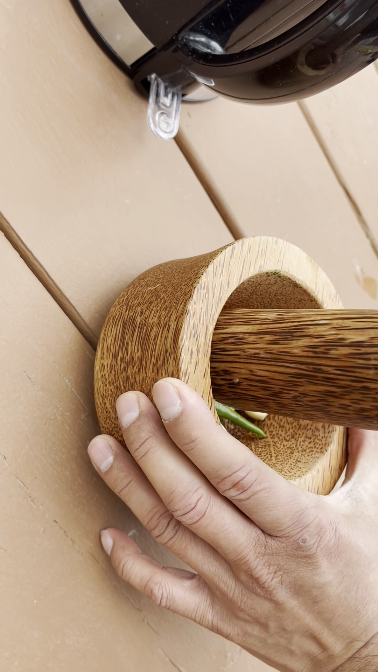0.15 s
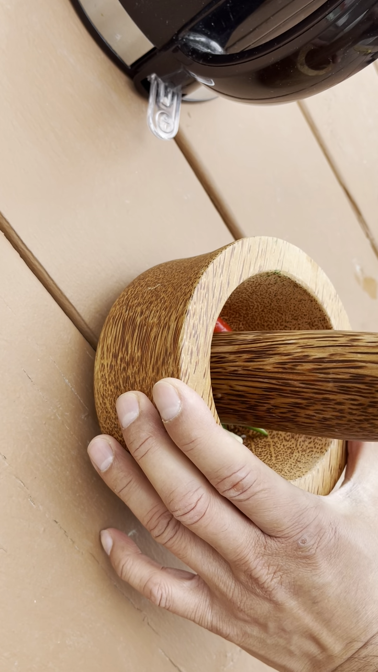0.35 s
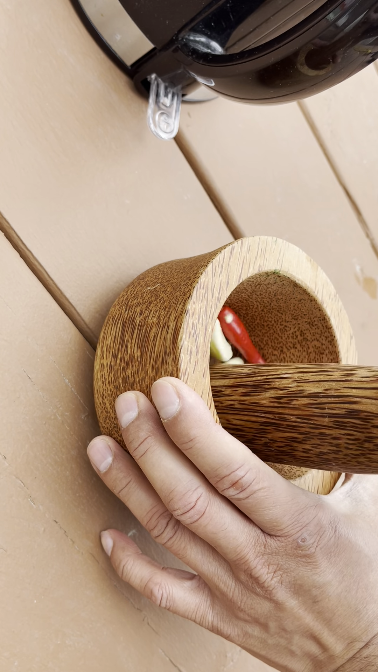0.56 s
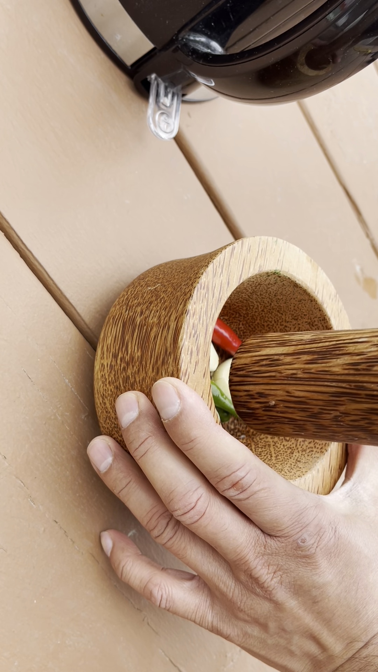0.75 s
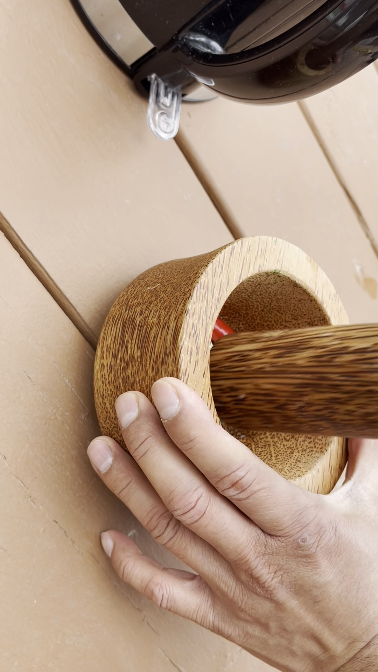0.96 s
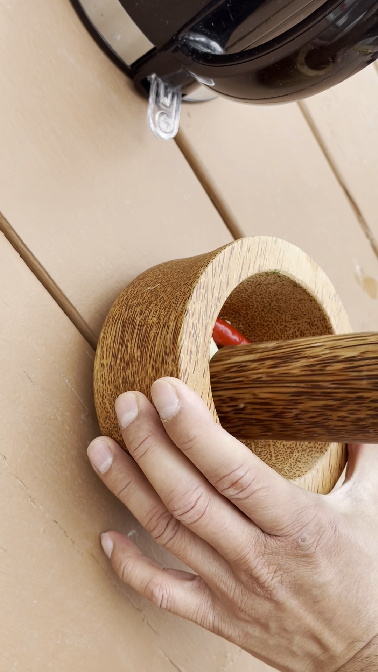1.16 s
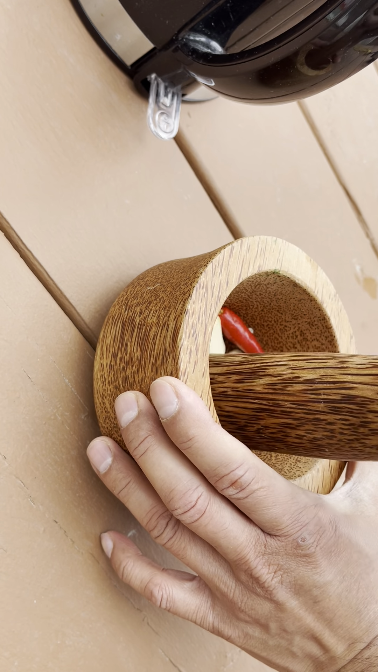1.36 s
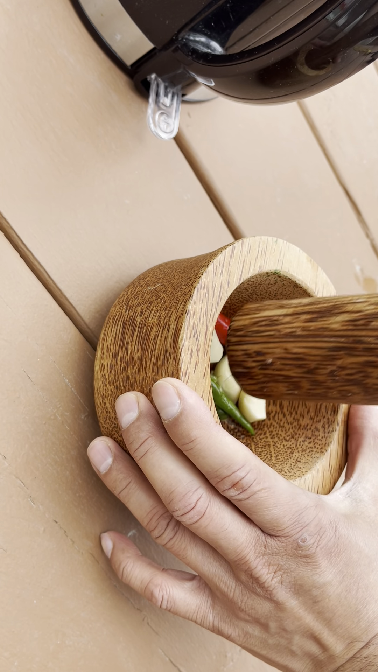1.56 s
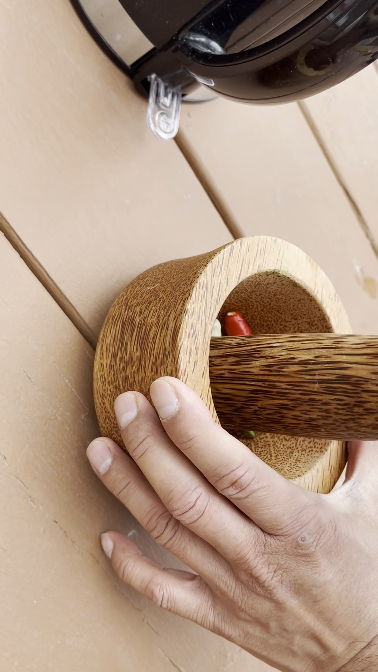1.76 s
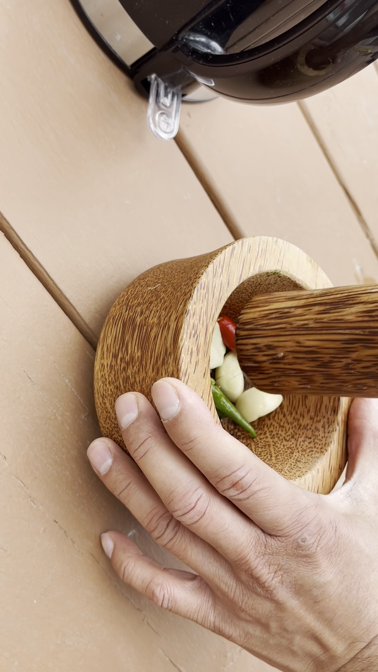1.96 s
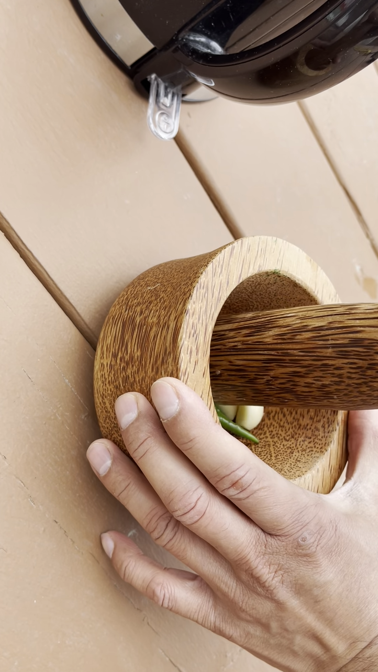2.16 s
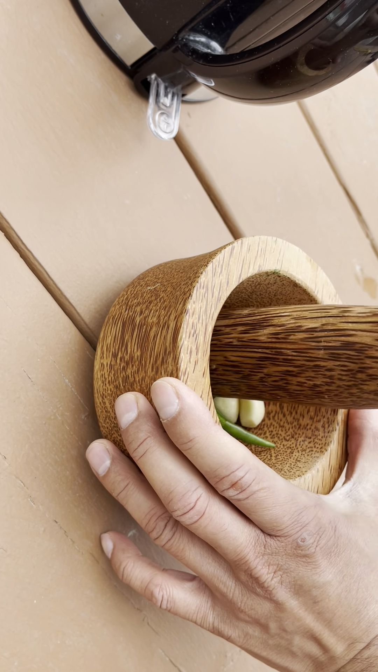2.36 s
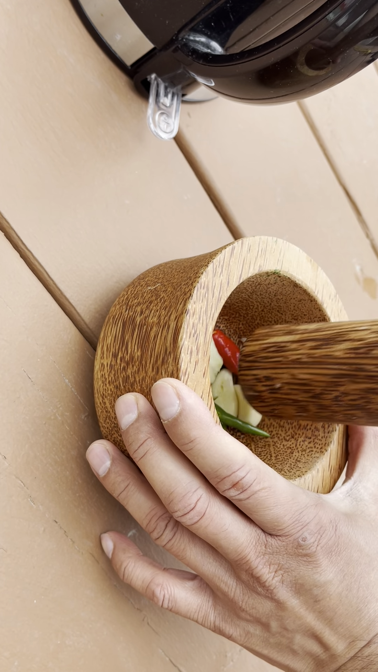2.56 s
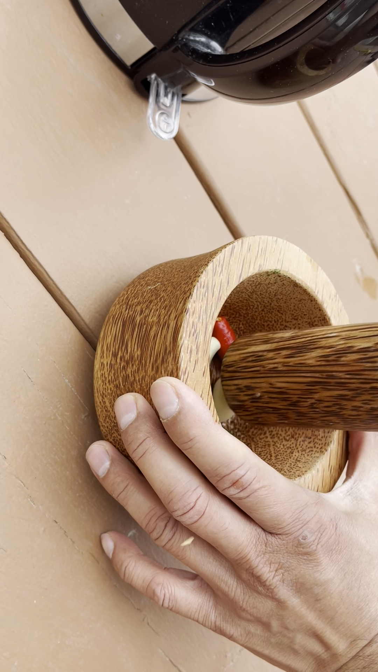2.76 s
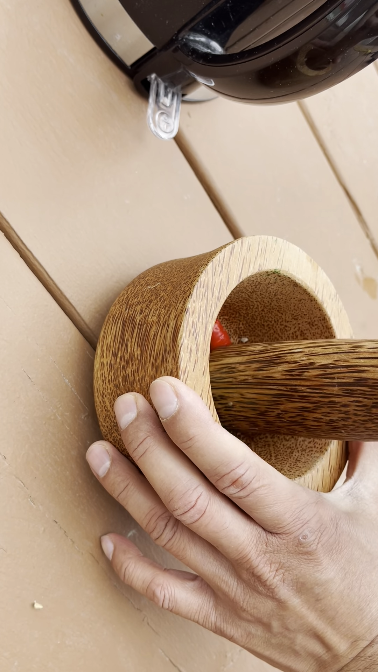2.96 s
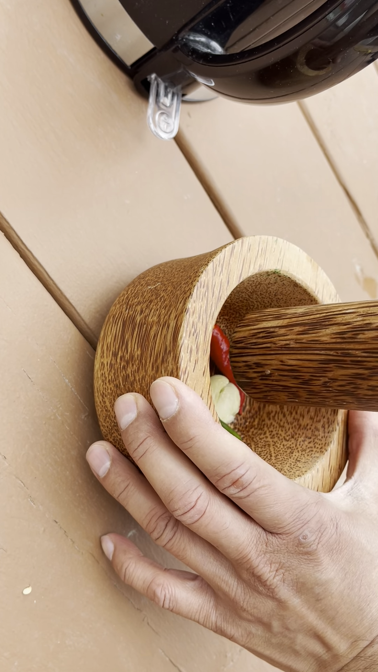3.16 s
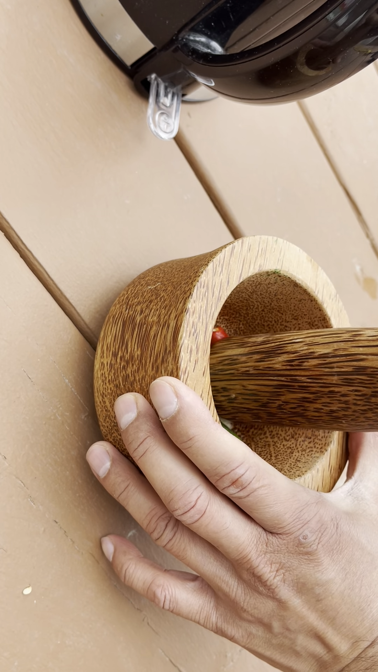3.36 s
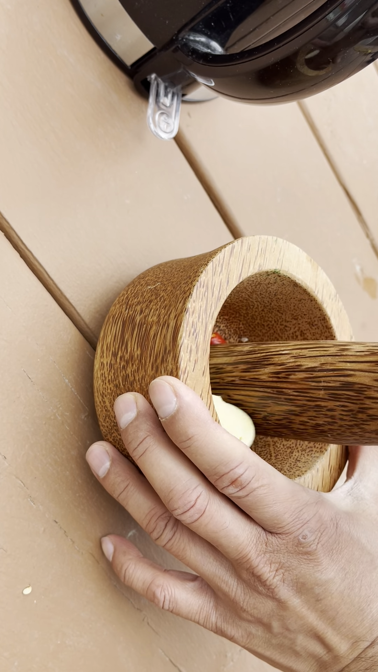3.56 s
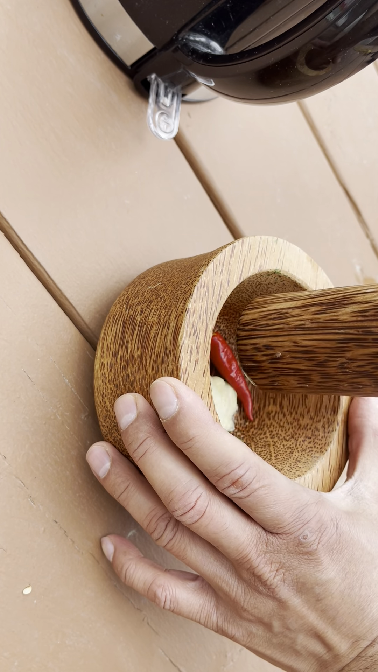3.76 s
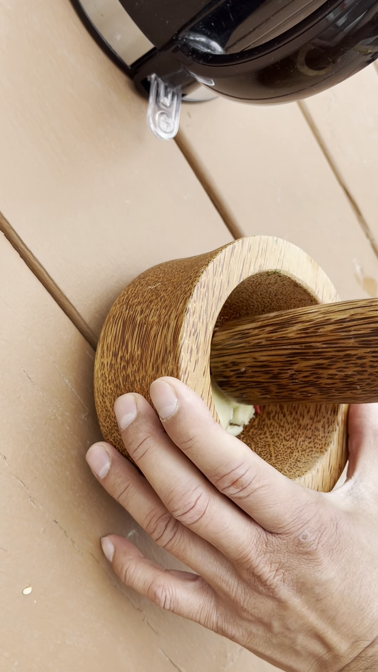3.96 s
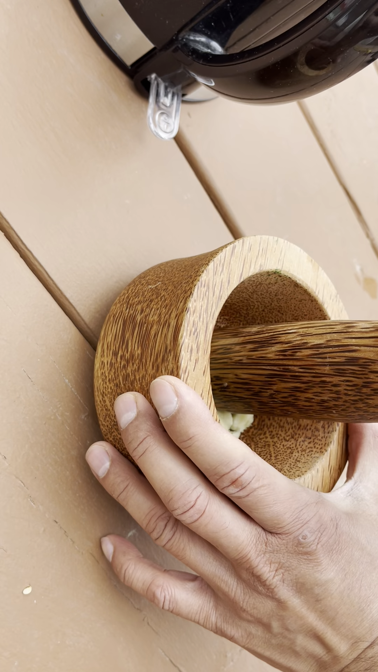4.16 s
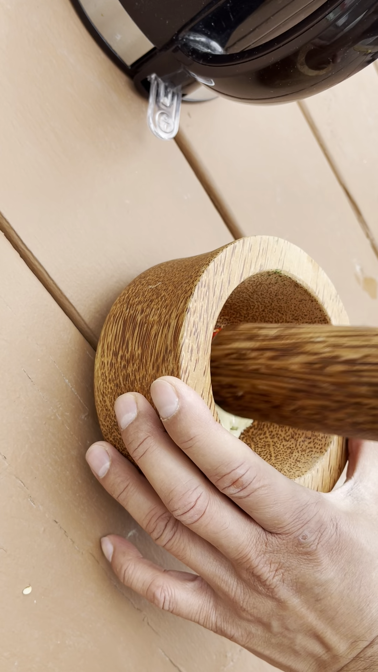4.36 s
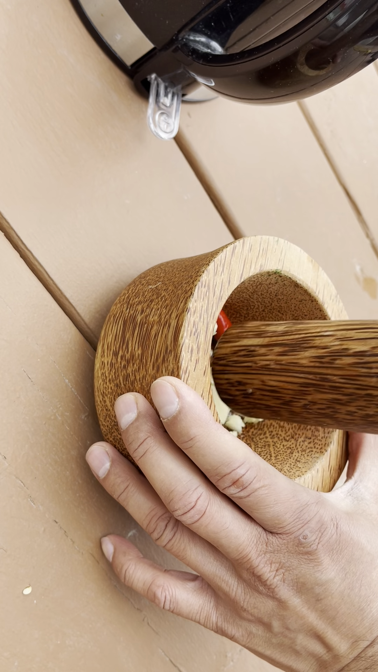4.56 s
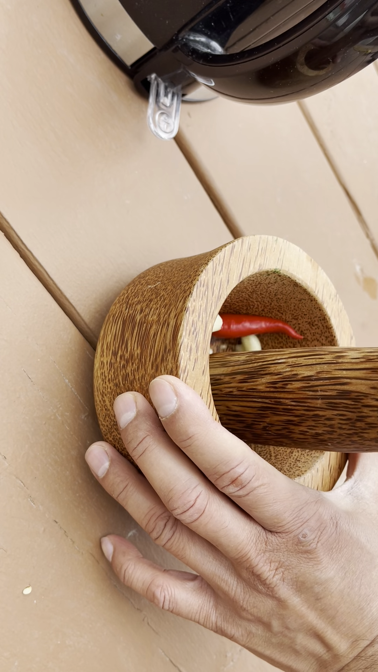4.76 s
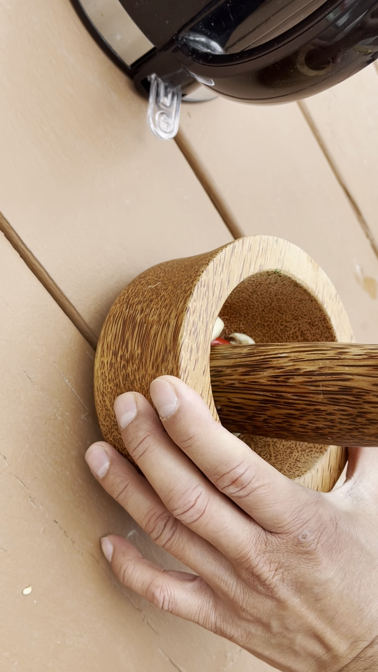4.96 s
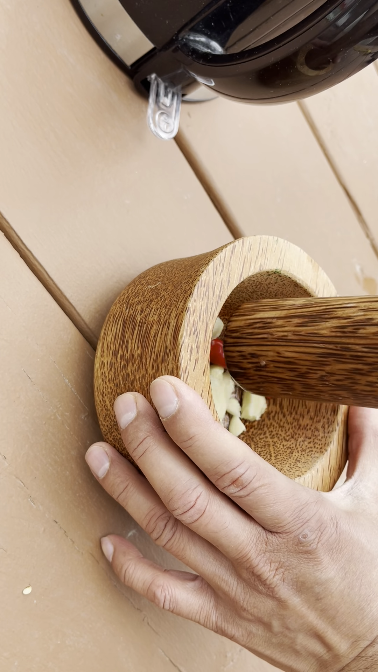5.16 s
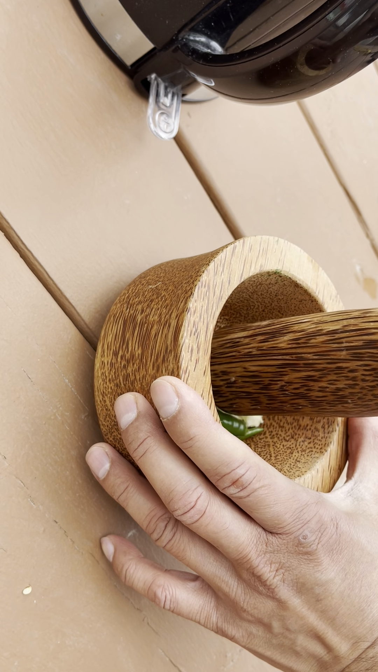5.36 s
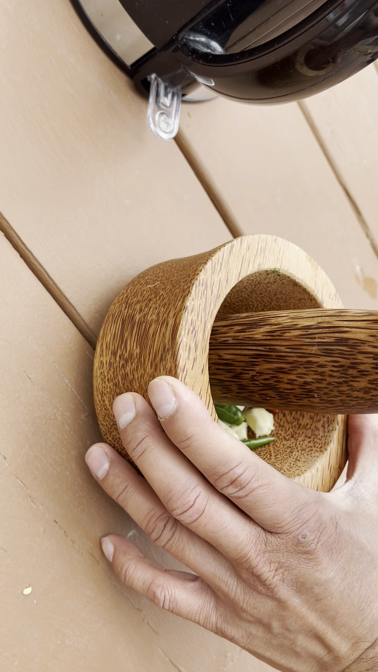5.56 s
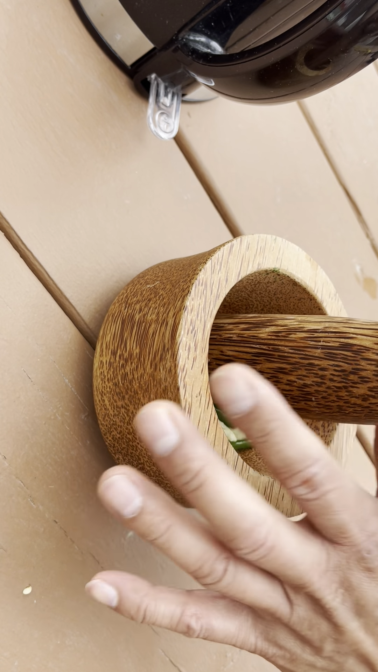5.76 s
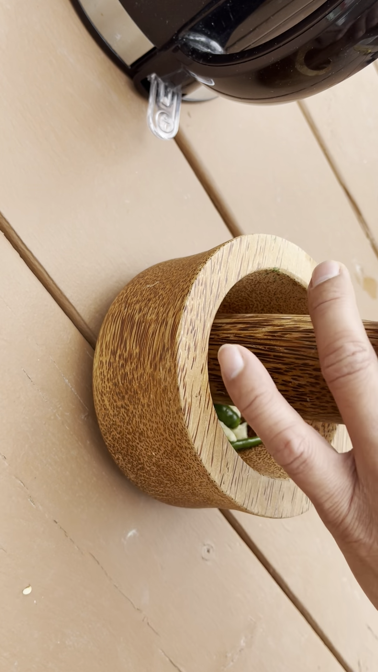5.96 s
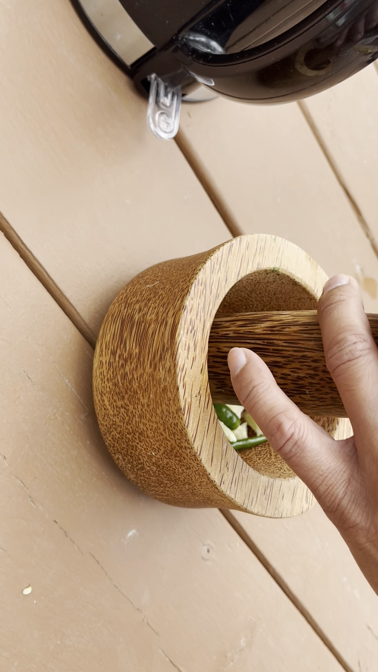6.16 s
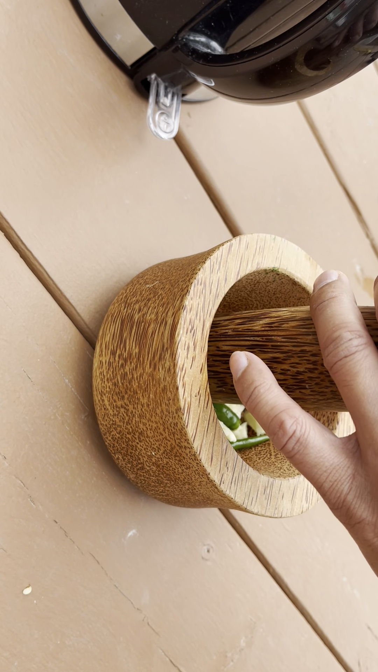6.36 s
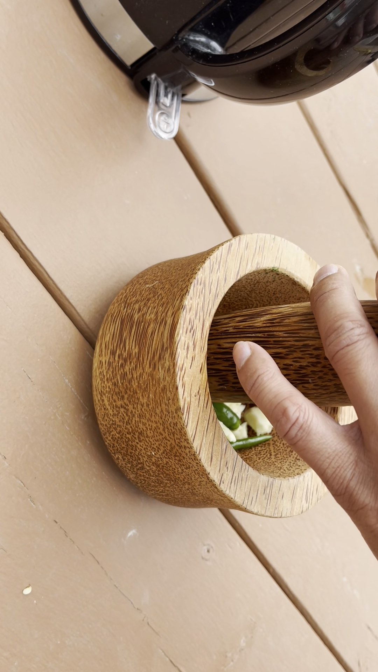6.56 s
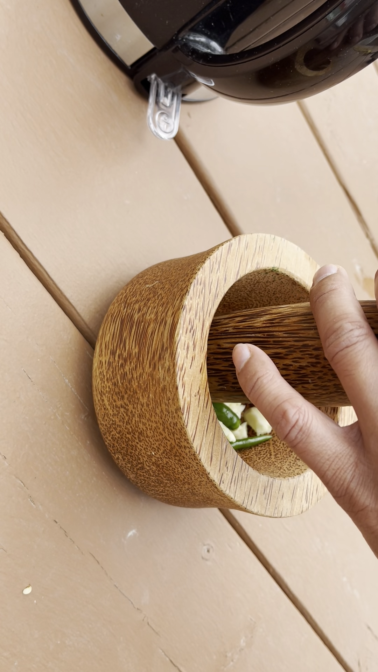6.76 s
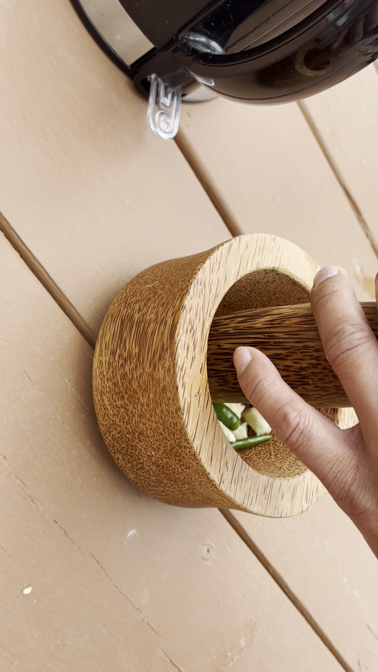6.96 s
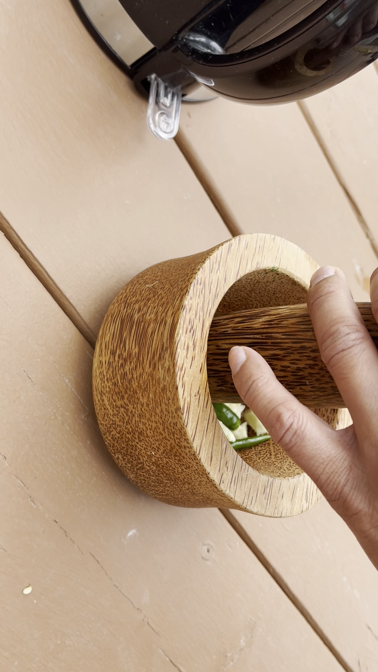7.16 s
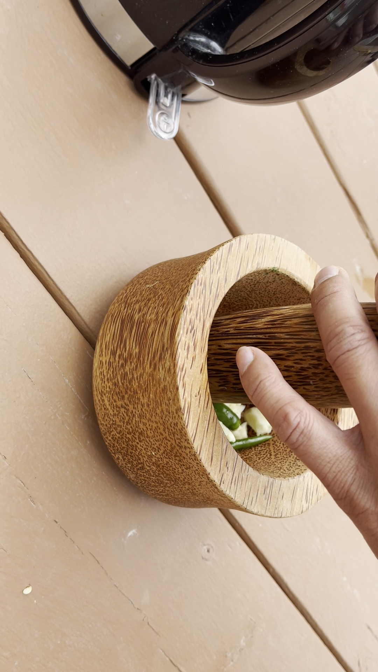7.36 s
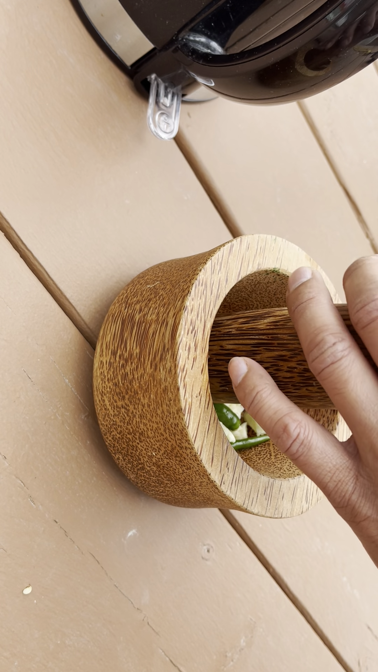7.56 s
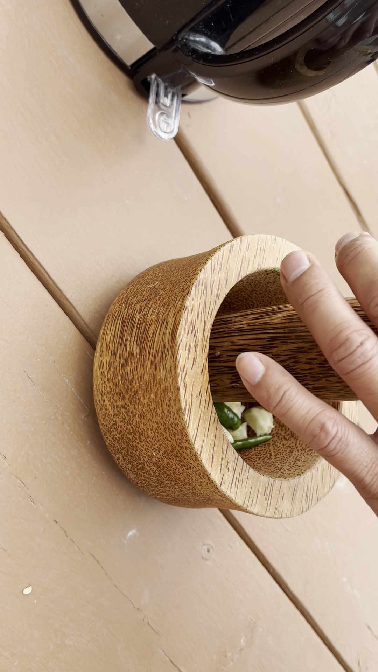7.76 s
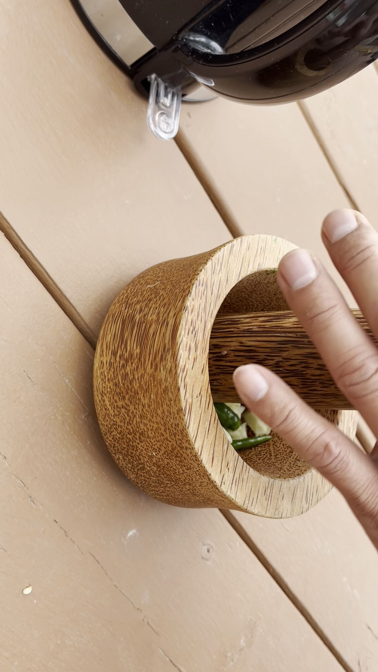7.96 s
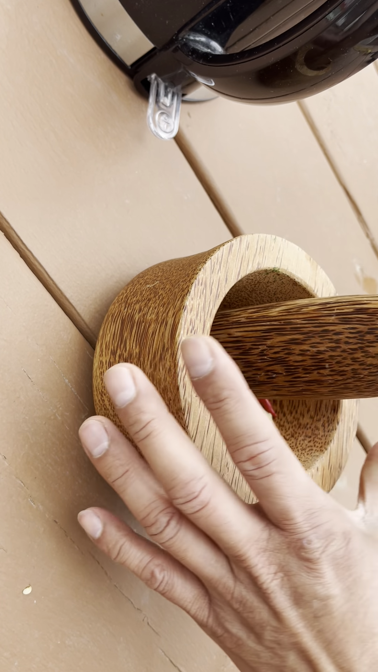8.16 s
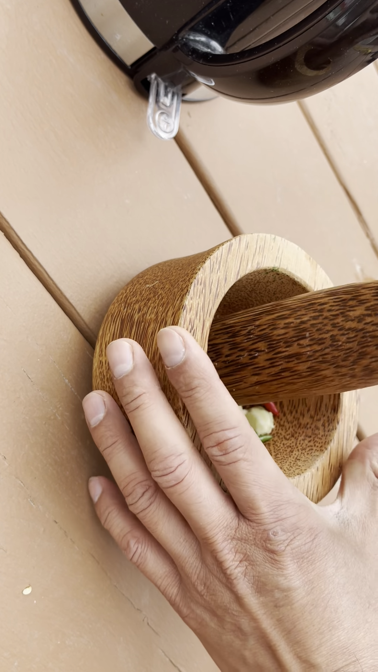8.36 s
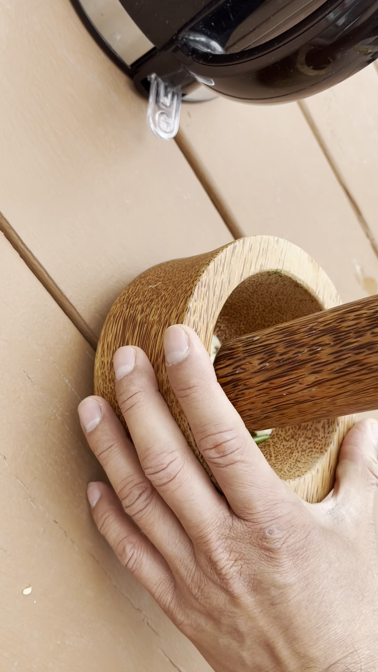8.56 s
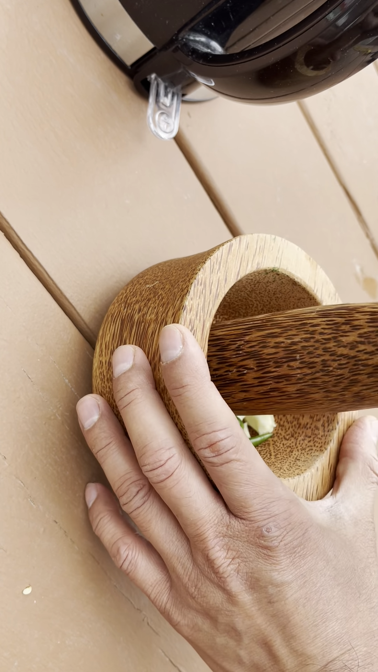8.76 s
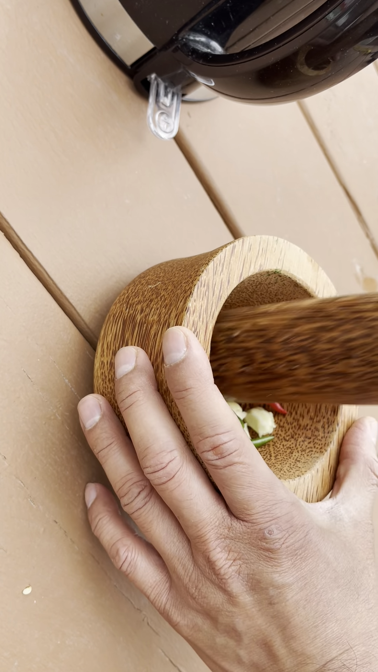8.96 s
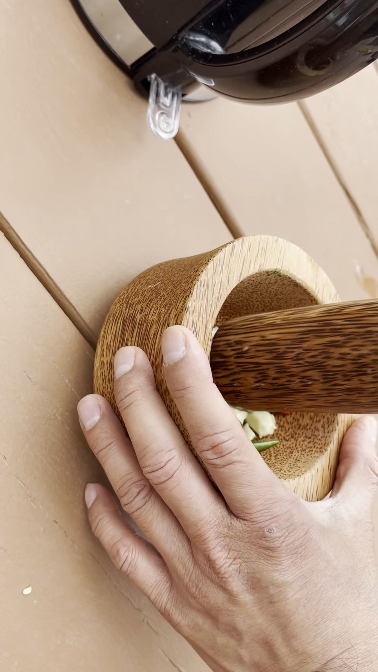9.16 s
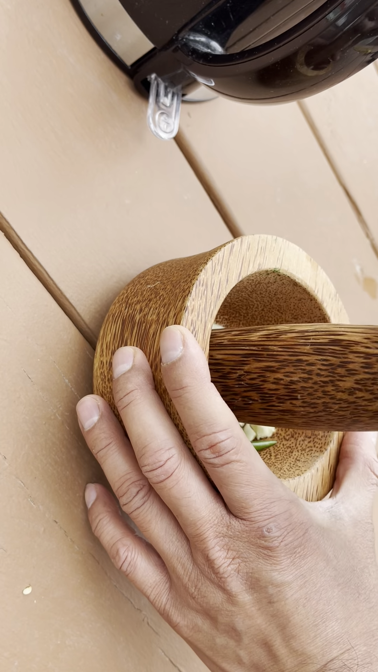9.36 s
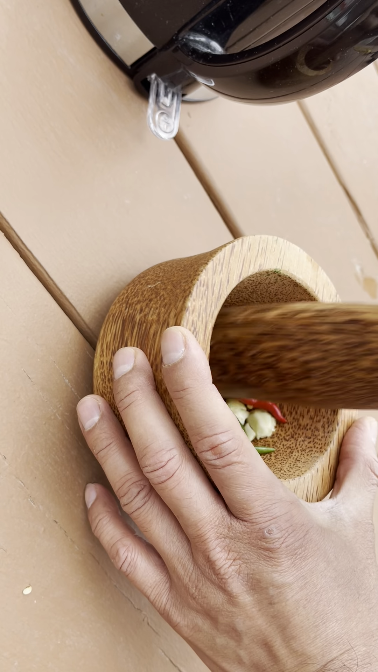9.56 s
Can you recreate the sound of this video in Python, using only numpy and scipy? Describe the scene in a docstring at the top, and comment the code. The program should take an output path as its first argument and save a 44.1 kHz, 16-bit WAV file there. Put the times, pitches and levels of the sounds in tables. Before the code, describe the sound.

Close, steady wooden knocks and deep board thuds with crisp crunching, over faint traffic; a faint machine starts up, wind rumbles, then pounding returns.

```python
"""Traffic rumbles far off throughout, as shaped noise, while a wooden pestle pounds garlic and chilies in a mortar.
Each blow crunches (noise grains), thuds and knocks (sums of decaying modes), then pulp grinds and squelches.
Near the middle a machine swishes up to speed, then hisses and whines (resonant noise, wandering sines).
Wind buffets the microphone (short distorted swings), mostly in the pause after the machine has started, among
touches, rubs and soft blips; pounding resumes near the end."""
import sys
import numpy as np
from scipy import signal
from scipy.fft import rfft, irfft, next_fast_len
from scipy.io import wavfile
from scipy.ndimage import uniform_filter1d, minimum_filter1d

SR = 44100
rng = np.random.default_rng(int(sys.argv[2]) if len(sys.argv) > 2 else 0)


def transcribe(u):
    """Save the signal u as a 16-bit wav file named by the first command-line argument.

    u: samples, shape (n,) or (channels, n), limited to [-1, 1]; the rate is SR.
    q: integer samples, one column per channel.
    """
    v = np.clip(np.atleast_2d(u).T, -1, 1)
    q = np.round(v * 32767).astype(np.int16)
    wavfile.write(sys.argv[1], SR, q)


N = 423801

# Spectrum of the far rumble: (frequency [Hz], density [dB per Hz])
FAR_SPECTRUM = [(12, -28), (20, -7), (43, 5), (100, -2), (217, -14.5), (254, -12), (351, -24), (483, -24),
                (1050, -30.5), (2900, -50.5), (12000, -56.5), (15600, -105), (22000, -120)]
# Phase by which the left port leads the right: (frequency [Hz], lead [rad])
LEFT_LEAD = [(0, 0), (950, .6), (1460, 0), (2930, .8), (4390, 1.5), (5340, 5.3), (5770, 6.1), (8440, 9.1),
             (9560, 9.7), (12000, 12.3), (15500, 15.6)]
# Level of the left port over the right: (frequency [Hz], level [dB])
LEFT_GAIN = [(60, -.5), (200, -2), (700, -4.5), (1290, -1), (2380, -1.5), (4400, -.3), (15000, 0)]
# Pestle blows: (time [s], thud level [dB], thud centre [Hz], knock level [dB], knock centre [Hz],
# crunch level [dB])
BLOWS = [(.006, -1.5, 223, -10, 637, -12.5), (.268, -10, 137.8, -24, 480, -23),
         (.547, -11, 165.5, 0.5, 1640, -17.5), (1.016, -4.5, 155.4, -12, 513, -16.5),
         (1.329, -2.5, 125, -1, 483, -10.5), (1.744, -5.5, 153, -16.5, 525, -15),
         (2.074, -9.5, 141, -4.5, 556, -20.5), (2.329, -5, 149, -15, 570, -21.5),
         (2.611, -15.5, 207.8, 2.5, 1775, -24), (2.918, -12.5, 258, -2, 1880, -14.5),
         (3.028, -32.5, 237.5, -28, 1240, -68.5), (3.248, -5.5, 157, -10.5, 529, -17),
         (3.546, -7, 225, -26.5, 680, -18.5), (3.854, -17, 133.5, -24.5, 660, -18.5),
         (4.123, -7, 133.2, 6.5, 1546, -11), (4.413, -14.5, 132.5, -20.5, 585, -19.5),
         (4.682, -9, 126, -20.5, 505, -17), (4.946, -10, 140, -26.5, 490, -17),
         (5.24, -13, 192.3, -32.5, 560, -26.5), (5.522, -14, 237, -27.5, 630, -18.5),
         (8.741, -15.5, 132, -25, 646, -29.5), (9.015, -2.5, 128.4, -15, 588, -17),
         (9.3, -4.5, 131.5, -9.5, 484, -13.5), (9.596, -13, 186, -15, 557, -17)]
# Modes of the boards under the mortar: (frequency [Hz], level [dB], T60 [s])
BOARD_MODES = [(72.3, -7.5, 0.92), (107.9, -11, 0.98), (137.7, 5.5, 0.28), (165.3, 4.5, 0.099),
               (207, -4.5, 0.018), (257.6, 0, 0.21), (296, -5, 0.22), (346.5, -8.5, 0.19),
               (388, -15, 0.072)]
# Modes of mortar and pestle: (frequency [Hz], level [dB], T60 [s])
WOOD_MODES = [(467.6, 6, 0.078), (529, 17, 0.035), (613.3, 12.5, 0.062), (683.6, 2.5, 0.084),
              (740.6, -5, 0.022), (849.5, 1.5, 0.039), (905, -9.5, 0.13), (1010, -6, 0.1), (1044, 0, 0.067),
              (1203, -6, 0.062), (1305, -6.5, 0.017), (1440, -14, 0.039), (1551, -5.5, 0.056),
              (1756, 2, 0.013), (1830, -11.5, 0.026), (2264, -2.5, 0.036), (2520, -15.5, 0.014),
              (3050, 1, 0.0076), (3390, -12, 0.019), (3980, -10.5, .01)]
# Spectrum of snapping fibres: (frequency [Hz], density [dB per Hz])
CRUNCH_SPECTRUM = [(300, -51.5), (900, -4), (2000, 1), (3500, 0.5), (5500, -2.5), (8000, 0.5), (10500, 3),
                   (13000, -14.5), (16000, -19.5)]
# Spectrum of the sticky crackle: (frequency [Hz], density [dB per Hz])
STICKY_SPECTRUM = [(300, -12.5), (1000, 1.5), (2000, -12), (4000, -7.5), (8000, -12), (11000, -5.5),
                   (13000, -31)]
# Spectrum of pressed or rubbed pulp: (frequency [Hz], density [dB per Hz])
SQUASH_SPECTRUM = [(300, -26), (780, -2), (950, 12), (1200, 0), (1750, 6), (2400, -5), (5000, -17),
                   (12000, -39)]
# Pulp squirting under a blow or squelching at the lift: (time [s], level [dB], length [s])
SQUELCHES = [(0.087, -45, 0.02), (0.278, -21.5, 0.033), (0.289, -42, 0.094), (0.36, -35, 0.05),
             (0.634, -51.5, 0.021), (0.734, -49.5, .012), (1.132, -39.5, 0.053), (1.338, -23.5, 0.041),
             (1.465, -39.5, 0.063), (1.835, -41, 0.078), (2.06, -49.5, 0.033), (3.633, -49, 0.064),
             (4.013, -49, .01), (4.7, -41, 0.012), (5.232, -23.5, 0.03), (5.261, -24.5, 0.029)]
# Spectrum of the squelches: (frequency [Hz], density [dB per Hz])
WET_SPECTRUM = [(500, -45), (2000, 3.5), (4000, -3.5), (7000, 5), (10500, 13.5), (13000, -7), (16000, -5.5)]
# Pestle or fingers rubbing over pulp and wood: (time [s], level [dB], length [s])
RUBS = [(0.372, -54, .05), (0.623, -50, 0.041), (2.35, -49, 0.087), (3.274, -52.5, 0.12),
        (3.908, -52, 0.068), (4.511, -58, 0.066), (4.716, -54, 0.11), (6.577, -52, 0.1),
        (7.161, -49, 0.049), (7.236, -57, 0.11), (7.321, -47, 0.059), (6.495, -49, 0.071), (7.383, -59, .1),
        (9.12, -50, .05), (9.415, -46, .045)]
# Light touches of pestle and hand on the mortar: (time [s], knock level [dB], knock centre [Hz],
# rasp level [dB])
TOUCHES = [(0.531, -25.5, 550, -36.5), (2.521, -47, 1766, -59.5), (4.241, -41.5, 1000, -54),
           (6.504, -28.5, 558, -35), (6.635, -33.5, 497, -39.5), (7.143, -26.5, 738, -32.5),
           (7.309, -22, 557, -39.5), (7.398, -28, 580, -46)]
# Strong wind buffets: (time [s], level [dB], centre [Hz])
BUFFETS = [(0.719, -20.5, 64.2), (6.607, -27, 53.3), (7.259, -23.5, 75), (7.824, -26, 51.3),
           (7.921, -23, 63.4), (8.011, -22, 78.6), (8.05, -17.5, 53), (8.085, -22, 79.3),
           (8.186, -15.5, 83), (8.279, -26, 199), (8.31, -27, 208), (8.365, -23.5, 72.6),
           (8.523, -23.5, 93), (8.363, -24, 202)]
# Strength of the small wind puffs: (time [s], level [dB])
GUST = [(6.199, -51), (6.5, -34), (6.9, -41), (7.4, -31), (7.7, -38.5), (8.15, -22.5), (8.6, -46)]
# Machine noise: (time [s], hiss level [dB], treble level [dB])
MACHINE_LEVELS = [(4.6, -77, -94.5), (5.08, -52, -47), (6.27, -53.5, -44.5), (6.87, -53.5, -51),
                  (7.08, -53, -44.5), (8.3, -50, -37.5), (8.67, -54, -44), (9.13, -46, -33),
                  (9.61, -51, -45)]
# Spectrum of the hiss: (frequency [Hz], density [dB per Hz])
HISS_SPECTRUM = [(300, -25), (800, -6), (2500, -4), (4200, -5.5), (7000, -10.5), (8500, -7), (11000, -33)]
# Climbing swishes while the machine gathers speed: (time [s], length [s], start [Hz], end [Hz], level [dB])
SWISHES = [(4.78, .18, 1950, 2650, -54), (4.97, .26, 1850, 3000, -48), (5.02, .26, 2000, 2450, -51),
           (5.15, .55, 2700, 3600, -56)]
# Blurred tones at full speed: (frequency [Hz], level against the hiss [dB], loudest at [s], fade [dB per s])
WHINE_TONES = [(366, -8, 6.6, 3), (1098, -13, 7.4, 2), (1458, -11, 6.4, 6), (1449, -6, 8.25, 14),
               (1452, -10, 9.2, 25), (1938, -9, 6.0, 8), (2444, -10, 8.2, 14), (2750, -13, 9.3, 12),
               (3295, -12, 7.4, 2), (4048, -12, 8.4, 14)]
# Short soft blips in pairs: (time [s], level [dB], frequency [Hz])
BLIPS = [(6.771, -48, 1320), (6.879, -48, 1305), (7.614, -45, 1330), (7.744, -49, 1320)]

FAR_DB = -40
LOW_SWELL_DB, LOW_SWELL_HZ = 3, 250   # only the bass of the far rumble swells
LEAD_S = 0.0023   # crunch before the impact, for crunch and knock at 0 dB
LEAD_HALVES_DB, BARE_KNOCK_DB = 15, 29   # the lead halves per this rise of the crunch, of the knock
REBOUND_DB, RUMBLE_DB = -2.5, -10   # against the thud
KNOCK_FOCUS_DB = 25   # how narrowly a knock favours the modes near its centre
BOWL_DB, BOWL_T60_S = -38, .2   # the bowl rings on; level against the knock
CRACKLE_DB = -21.5   # against the crunch
GRIND_DB, GRIND_S = -40, .11   # pestle pressed on the pulp; level against the thud
LIFT_DB, LIFT_S, LIFT_AFTER_S = -54, .06, .118   # then it scrapes free; level against the thud, mean delay
SCUFF_DB, SCUFF_S = -27, 0.022   # each touch drags a little; level against its knock
PUFF_GAP_S, PUFF_HZ = 0.051, 69.5   # typical spacing and pitch of the small puffs
STREAK_DB, STREAK_HZ = 5.5, 45   # depth and spacing of the narrow resonances in the hiss
PLAIN_HISS_DB = -12.5   # plain hiss, alike and unshifted in both ports, against the streaky hiss
FULL_SPEED_S, TONE_BLUR_HZ, TONE_WANDERS_DB = 5.6, 4.0, 2.0
BLIP_S = 0.023
CUTOFF_HZ = 16000


def amp(db):
    """Logarithmic level: 20 dB is a factor of ten in pressure."""
    return 10 ** (np.asarray(db) / 20)


def at_hz(points, hz):
    """Logarithmic frequency scale: points are joined by straight lines over log frequency."""
    known_hz, values = np.array(points).T
    return np.interp(np.log(hz + 1), np.log(known_hz + 1), values)


def in_time(rows):
    """Linear interpolation: each column becomes a curve over the whole scene."""
    s, *columns = np.transpose(rows)
    return [np.interp(np.arange(N) / SR, s, column) for column in columns]


def filtered(order, hz, kind, x):
    """Butterworth filtering: a flat passband with smooth slopes."""
    return signal.sosfilt(signal.butter(order, hz, kind, fs=SR, output="sos"), x)


def coloured(x, spectrum):
    """Spectral shaping: each frequency is weighted by the spectrum; rms 1."""
    size = next_fast_len(N)
    weights = amp(at_hz(spectrum, np.arange(size // 2 + 1) * SR / size))
    y = irfft(rfft(x, size) * weights, size)[..., :N]
    return y / np.sqrt(np.mean(y ** 2))


def drift(rate_hz, size=N):
    """Slow random modulation: chance values joined by lines, spread about 1."""
    steps = rng.standard_normal(int(size / SR * rate_hz) + 2)
    return np.interp(np.arange(size) / SR * rate_hz, np.arange(len(steps)), steps) * np.sqrt(3 / 2)


def add(out, s, x):
    """Superposition: an event is summed in at its time."""
    i = max(round(s * SR), 0)
    out[i:i + len(x)] += x[:N - i]


def peak_one(x):
    """Normalization: the largest excursion becomes 1."""
    return x / np.max(np.abs(x))


def hump(length_s, skew):
    """Sine-squared envelope: a smooth rise and fall; skew under 1 peaks early."""
    return np.sin(np.linspace(0, 1, max(int(length_s * SR), 9)) ** skew * np.pi) ** 2


def swell(lead_s, t60, tail_db, tail_t60):
    """Two-stage decay: grows to its peak, dies fast and leaves a fainter tail."""
    t = np.arange(SR // 4) / SR
    rise = np.linspace(0, 1, max(int(lead_s * SR), 2)) ** 1.24
    return np.r_[rise, amp(-60 * t / t60) + amp(tail_db - 60 * t / tail_t60)]


def grains(per_s, spread_db):
    """Shot noise of snapping fibres: random clicks of uneven size over a little noise."""
    sizes = amp(spread_db * np.minimum(rng.exponential(1, N), 4)) * rng.choice([-1, 1], N)
    clicks = sizes * (rng.random(N) < per_s / SR)
    return clicks + 0.31 * rng.standard_normal(N)


def ports(x):
    """Two-port stereo cues: both ports hear one sound, the left slightly earlier and weaker in the low middle."""
    size = next_fast_len(N + 999)
    hz = np.arange(size // 2 + 1) * SR / size
    lead = np.interp(hz, *np.transpose(LEFT_LEAD))
    half = amp(at_hz(LEFT_GAIN, hz) / 2) * np.exp(.5j * lead)   # each port takes half the difference
    return irfft(rfft(x, size) * np.array([half, 1 / half]), size)[:, :N]


def far_rumble():
    """Diffuse field: distant traffic is shaped noise, partly different at each port, with swelling bass."""
    mid, side = coloured(rng.standard_normal((2, N)), FAR_SPECTRUM)
    far = amp(FAR_DB) * (ports(mid) + 0.44 * side * [[1], [-1]])
    bass = filtered(1, LOW_SWELL_HZ, "low", far)
    return far + (amp(LOW_SWELL_DB * drift(8)) - 1) * bass


def crunching():
    """Brittle fracture: fibres snap in a burst that leads up to each impact; touches rasp."""
    envelope = np.zeros(N)
    for s, _, _, knock_db, _, crunch_db in BLOWS:
        lead_s = LEAD_S * 2 ** -(crunch_db / LEAD_HALVES_DB + knock_db / BARE_KNOCK_DB)
        add(envelope, s - lead_s, amp(crunch_db) * swell(lead_s, 0.021, -28.0, 0.14))
    for s, _, _, rasp_db in TOUCHES:
        add(envelope, s, amp(rasp_db) * swell(0.0017, 0.091, -51.5, .15))
    return envelope * amp(2 * drift(120)) * coloured(grains(12000, 4), CRUNCH_SPECTRUM)


def strike(modes, centre_hz, focus_db, contact_s, lag_s):
    """Modal synthesis: a half-sine contact force excites modes, those near the centre hardest; peak 1."""
    hz, db, t60 = np.transpose(modes)[:, :, None]
    db = db - focus_db * np.abs(np.log2(hz / centre_hz)) ** 0.26
    db = db + 2 * rng.standard_normal(hz.shape)   # no two blows land alike
    hz = hz * (1 + .015 * rng.standard_normal(hz.shape))   # the grip shifts the modes a little
    lag = lag_s * (100 / hz - 100 / hz.max())   # low bending waves travel slower
    t = np.maximum(np.arange(int(0.98 * t60.max() * SR)) / SR - lag, 0)
    decay = amp(-60 * t / t60) + amp(15.0 - 60 * t / (.3 * t60))   # most energy leaks away fast
    decay = decay * (1 - np.exp(-t * hz / 0.37))   # each mode builds up over about a cycle
    rings = np.sum(amp(db) * decay * np.sin(2 * np.pi * hz * t), axis=0)
    force = np.sin(np.linspace(0, np.pi, max(int(contact_s * SR), 1) + 2))
    return peak_one(signal.fftconvolve(rings, force))


def rebound(hz):
    """Damped oscillation: the mortar sinks into the boards and swings back, ever slower; peak 1."""
    t = np.arange(SR // 8) / SR
    turns = hz * (t + 0.0034 * (1 - np.exp(-t / 0.0044)))
    envelope = (1 - np.exp(-t / 0.006)) ** 2 * amp(-60 * (t / 0.083) ** 0.58)
    return peak_one(np.sin(2 * np.pi * turns) * envelope)


def board_thuds():
    """Structure-borne sound: blows set the board modes ringing, with a rebound and a rumble after."""
    out, rumble = np.zeros((2, N))
    for s, thud_db, thud_hz, _, _, _ in BLOWS:
        add(out, s, amp(thud_db) * strike(BOARD_MODES, thud_hz, 1.1, 0.00093, 0.0072))
        add(out, s, amp(thud_db + REBOUND_DB) * rebound(thud_hz))
        add(rumble, s, amp(thud_db + RUMBLE_DB) * swell(0.01, 0.21, -30.0, 1.0))
    boards = [(hz, db) for hz, db, _ in BOARD_MODES] + [(1500, -44.0), (4000, -60)]
    return out + rumble * coloured(rng.standard_normal(N), boards)


def chatter(x):
    """Repeated contact: a light touch skips several times, unevenly and mostly ever softer; peak 1."""
    contacts = np.zeros(SR // 10)
    times = np.cumsum(np.r_[0, rng.uniform(.003, .011, size=5)])
    contacts[(times * SR).astype(int)] = amp(-4 * np.arange(6) + rng.normal(0, 2, 6))
    return peak_one(signal.fftconvolve(x, contacts))


def wood_knocks():
    """Impact radiation: wood meets wood and the bowl rings on roughly; softer touches chatter."""
    out = np.zeros(N)
    t = np.arange(SR // 4) / SR
    for s, _, _, knock_db, knock_hz, _ in BLOWS:
        add(out, s, amp(knock_db) * strike(WOOD_MODES, knock_hz, KNOCK_FOCUS_DB, .0001, 0.0219))
        bowl = drift(320, size=len(t)) * np.sin(2 * np.pi * knock_hz * t)
        add(out, s, amp(knock_db + BOWL_DB - 60 * t / BOWL_T60_S) * bowl)
    for s, knock_db, knock_hz, _ in TOUCHES:
        touch = strike(WOOD_MODES, knock_hz, 3.0 * KNOCK_FOCUS_DB, .0009, 0.013)
        add(out, s, amp(knock_db) * chatter(touch))
    return out


def crackling():
    """Adhesive release: sticky pulp crackles in clumps after each crunch."""
    envelope = np.zeros(N)
    for s, *_, crunch_db in BLOWS:
        add(envelope, s, amp(crunch_db + CRACKLE_DB) * swell(0.0058, 0.11, -16.0, 0.55))
    return envelope * amp(4 * drift(60)) * coloured(grains(1200, 5), STICKY_SPECTRUM)


def pressed_pulp():
    """Friction noise: the pestle grinds and scrapes free after blows; touches scuff, pestle or fingers rub."""
    envelope = np.zeros(N)
    for s, thud_db, *_ in BLOWS:
        add(envelope, s, amp(thud_db + GRIND_DB) * hump(GRIND_S, 0.24))
        lift_s = s + LIFT_AFTER_S + 0.021 * rng.standard_normal()
        lift_db = thud_db + LIFT_DB + 2 * rng.standard_normal()
        add(envelope, lift_s, amp(lift_db) * hump(LIFT_S, 0.27))
    for s, db, length_s in RUBS:
        add(envelope, s, amp(db) * hump(length_s, 0.54))
    for s, knock_db, _, _ in TOUCHES:
        add(envelope, s, amp(knock_db + SCUFF_DB) * hump(SCUFF_S, 0.46))
    return envelope * amp(4 * drift(70)) * coloured(grains(3000, 3.5), SQUASH_SPECTRUM)


def squelching():
    """Amplitude modulation: wet bursts of bright noise, each a smooth hump with a fast flutter."""
    humps = np.zeros(N)
    for s, db, length_s in SQUELCHES:
        add(humps, s, amp(db) * hump(length_s, 0.34))
    return humps * amp(3 * drift(150)) * coloured(grains(12000, 3), WET_SPECTRUM)


def small_puffs():
    """Turbulence: irregularly spaced puffs follow the gust's strength, with chance in level and pitch."""
    gust_s, gust_db = np.transpose(GUST)
    puffs = []
    for i, (late, size, pitch) in enumerate(rng.standard_normal((100, 3))):
        s = gust_s[0] + PUFF_GAP_S * (i + 0.35 * late)
        if s < gust_s[-1]:
            puffs.append((s, np.interp(s, gust_s, gust_db) + 1.2 * size, PUFF_HZ * 2 ** (.25 * pitch)))
    return puffs


def wind():
    """Pressure fluctuation: each puff pushes the membrane, which swings back and forth a few times."""
    out = np.zeros((2, N))
    for s, db, hz in list(BUFFETS) + small_puffs():
        turns = np.linspace(0, 2.6, int(3.09 * SR / hz)) ** 1.04
        envelope = np.sin(np.pi * (turns / turns[-1]) ** 0.34) ** 2
        shape = np.sin(2 * np.pi * turns) * envelope * rng.choice([-1, 1])
        # steep flanks add overtones
        shape = shape + 0.6 * np.gradient(shape * np.abs(shape)) * SR / (2 * np.pi * hz)
        for port in out:
            add(port, s + rng.uniform(0, 0.0017), amp(db + 1.0 * rng.standard_normal()) * shape)
    return out


def streaky_hiss():
    """Resonant filtering: noise through many narrow resonances, two sets of which come and go."""
    hz = np.arange(STREAK_HZ, SR / 2, STREAK_HZ)
    turn = 1.5 * drift(2.7)
    out = np.zeros(N)
    for weight in (np.cos(turn), np.sin(turn)):
        level_db = at_hz(HISS_SPECTRUM, hz) + STREAK_DB * rng.standard_normal(len(hz))
        out += weight * coloured(rng.standard_normal(N), np.c_[hz, level_db])
    return out


def treble_band():
    """Band limiting: noise is kept between a gentle lower and a steep upper edge, its level wavering."""
    treble = filtered(2, 7800, "high", rng.standard_normal(N))
    upper_edge = signal.cheby2(10, 50, 12300, fs=SR, output="sos")
    return signal.sosfilt(upper_edge, treble) * amp(0.97 * drift(7.5))


def swishing():
    """Frequency sweep: narrow-band noise climbs, fast at first, as the machine gathers speed."""
    out = np.zeros(N)
    for s, length_s, from_hz, to_hz, db in SWISHES:
        shape = hump(length_s, .7)
        hz = from_hz + (to_hz - from_hz) * np.linspace(0, 1, len(shape)) ** .8
        carrier = np.sin(2 * np.pi * np.cumsum(hz) / SR)
        add(out, s, amp(db) * shape * drift(420, size=len(shape)) * carrier)
    return out


def whining(hiss_db):
    """Frequency modulation: tones blurred by random pitch drift, each fading either side of its loudest time."""
    t = np.arange(N) / SR
    running = np.clip((t - FULL_SPEED_S) / 0.49 + 1, 0, 1)
    out = np.zeros(N)
    for hz, db, loudest_s, fade_db in WHINE_TONES:
        level_db = hiss_db + db - fade_db * np.abs(t - loudest_s)
        level_db = level_db + TONE_WANDERS_DB * drift(3.0) + 2.5 * drift(25)
        phase = 2 * np.pi * np.cumsum(hz + TONE_BLUR_HZ * drift(16)) / SR
        out += running * amp(level_db) * np.sin(phase)
    return out


def machine():
    """Superposition: streaky hiss, treble, swishes and whine pass the port cues; plain hiss is alike in both."""
    hiss_db, treble_db = in_time(MACHINE_LEVELS)
    hiss_gain = amp(hiss_db + 0.5 * drift(8.3))
    cued = hiss_gain * streaky_hiss() + amp(treble_db) * treble_band() + swishing() + whining(hiss_db)
    plain_hiss = hiss_gain * coloured(rng.standard_normal(N), HISS_SPECTRUM)
    return ports(cued) + amp(PLAIN_HISS_DB) * plain_hiss


def soft_blips():
    """Windowed tones: short sines of one pitch under a smooth hump."""
    out = np.zeros(N)
    for s, db, hz in BLIPS:
        shape = hump(BLIP_S, 0.67)
        add(out, s, amp(db) * shape * np.sin(2 * np.pi * hz * np.arange(len(shape)) / SR))
    return out


def wall_echo(x):
    """Reflection: a dull echo off a nearby wall reaches the two ports with opposite sign."""
    late = np.r_[np.zeros(int(.005 * SR)), x][:N]
    return amp(-13.5) * filtered(1, [250, 1200], "band", late) * [[1], [-1]]


def scene():
    """Superposition: the pressures of all sources add at the two ports."""
    blows = crunching() + board_thuds() + wood_knocks() + crackling() + pressed_pulp() + soft_blips()
    return far_rumble() + ports(blows + squelching()) + wall_echo(blows) + wind() + machine()


def record(dry):
    """Dynamic compression: the bass rolls off, a fast limiter holds the blows down, the top is cut."""
    x = filtered(2, 45, "high", dry)
    room_left = np.minimum(1, .88 / (np.max(np.abs(x), axis=0) + 1e-9))
    gain = uniform_filter1d(minimum_filter1d(room_left, size=177), size=89)   # sizes in samples
    top_cut = signal.cheby2(12, 70, CUTOFF_HZ, fs=SR, output="sos")
    return signal.sosfilt(top_cut, x * gain)


dry = scene()
out = record(dry)
transcribe(out)
```